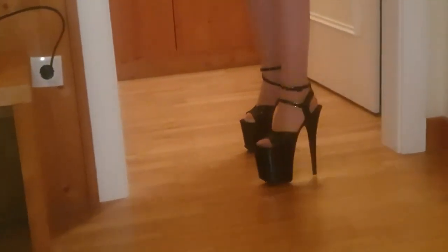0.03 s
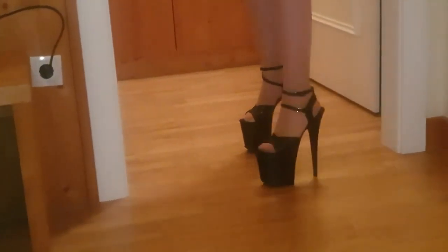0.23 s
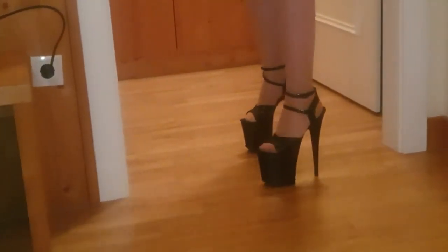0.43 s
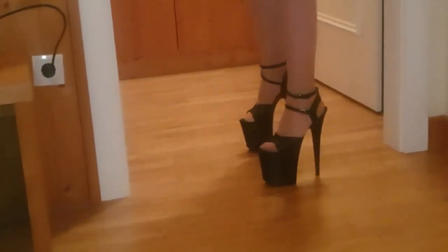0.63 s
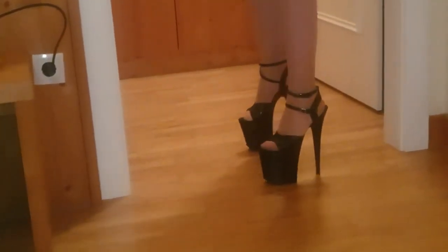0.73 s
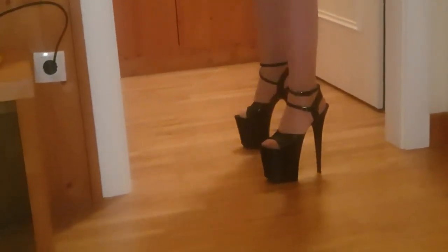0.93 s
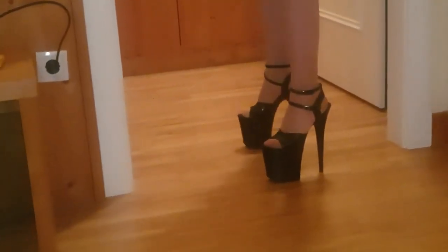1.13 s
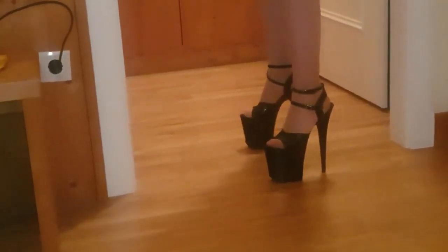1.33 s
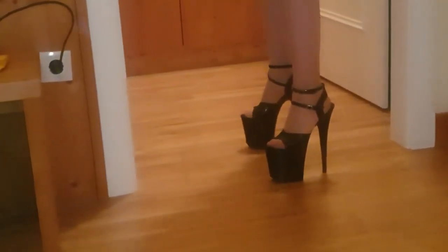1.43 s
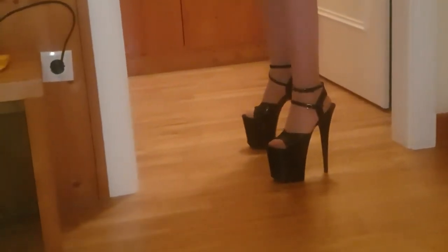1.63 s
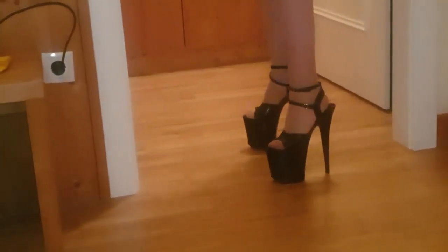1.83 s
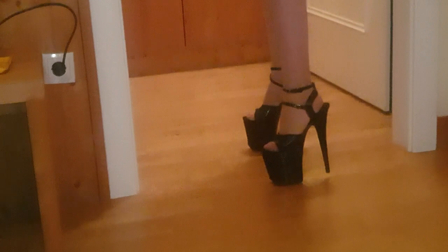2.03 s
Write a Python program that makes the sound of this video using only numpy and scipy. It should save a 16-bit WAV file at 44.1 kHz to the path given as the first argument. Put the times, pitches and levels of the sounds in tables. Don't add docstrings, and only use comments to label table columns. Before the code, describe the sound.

Platform shoes step on a wooden hallway floor: a heavy double thud with heel ticks, a light lone tick, then another softer double knock and faint settling, over low hum and microphone hiss.

```python
import sys
import numpy as np
from scipy import signal
from scipy.fft import rfft, irfft, next_fast_len
from scipy.io import wavfile
from scipy.ndimage import map_coordinates

SR = 44100
rng = np.random.default_rng(int(sys.argv[2]) if len(sys.argv) > 2 else 0)


def master(y):
    cut = np.clip(np.atleast_2d(y).T, -1, 1)
    pcm = np.round(cut * 32767)
    wavfile.write(sys.argv[1], SR, pcm.astype(np.int16))


def volts_from_decibels(level):
    exponent = np.asarray(level, float) / 20
    return 10 ** exponent


N = 92610


def unit(x):
    return x / np.sqrt(np.mean(x ** 2) + 1e-20)


def along(points, hz):
    f, v = np.transpose(points)
    return np.interp(np.log(hz + 1), np.log(f + 1), v)


def filtered(x, response):
    n = x.shape[-1]
    m = next_fast_len(n + 4096)
    return irfft(rfft(x, m) * response(np.fft.rfftfreq(m, 1 / SR)), m)[..., :n]


def peaks(table, f):
    return 1 + sum(volts_from_decibels(db) * 1j * f * w / (c * c - f * f + 1j * f * w) for c, w, db in table)


def band(hz, relative_width):
    w = hz * max(relative_width, 0.05)
    return lambda f: (1j * f * w / (hz * hz - f * f + 1j * f * w)) ** 2


def edge(f, hz, q=0.8):
    r = f / hz
    first, second, third = [1 - r ** 2 + 1j * r / section_q for section_q in (0.55, q, 1.84)]
    return 1 / (first * second * third)


def wobble(rate, n=N):
    return map_coordinates(rng.standard_normal(int(n * rate / SR) + 4), [np.arange(n) * rate / SR])


def panned(db, pan_db):
    return volts_from_decibels(db + np.array([[pan_db], [-pan_db]]) / 2)


def add(out, s, sound):
    part = out[:, round(s * SR):][:, :sound.shape[1]]
    part += sound[:, :part.shape[1]]


# frequency_hz, correlation (0 to 1)
ALIKE = [(100, 0.99), (400, 0.87), (900, 0.43), (2000, 0.067), (8000, 0.039)]


def pair(n):
    turn = lambda hz: np.arccos(np.clip(along(ALIKE, hz), -1, 1)) / 2
    share = lambda hz: np.array([np.cos(turn(hz)), np.sin(turn(hz))])
    mid, side = filtered(rng.standard_normal((2, n)), share)
    return np.array([mid + side, mid - side])


# frequency_hz, t60_s
REVERBERATION = [(100, 0.59), (300, 0.42), (1000, .42), (3000, 0.41), (10000, 0.47)]
HOLD_S, FILL_S = 0.032, 0.0019


def hallway(direct_db):
    n = SR // 2
    hz, t, z = signal.stft(pair(n), SR, nperseg=256)
    decay_db = -60 * np.maximum(t - HOLD_S, 0) / along(REVERBERATION, hz)[:, None]
    tail = signal.istft(z * volts_from_decibels(decay_db), SR, nperseg=256)[1][:, :n]
    tail = tail * (1 - np.exp(-np.arange(n) / SR / FILL_S))
    tail = tail / np.linalg.norm(tail[0])
    tail[:, 0] = volts_from_decibels(direct_db)
    return tail


# frequency_hz, width_hz, level_db
HUM = [(99.5, 13.8, 1), (195, 12, -12.5), (330, 14, -16.5)]
# time_s, lowest_line_level_db
HUM_LOAD = [(0.0, -65), (0.32, -65.5), (0.66, -66.5), (0.95, -66.5), (1.08, -64), (1.17, -62.5),
            (1.31, -63), (1.43, -74), (1.64, -66), (1.84, -66), (2.1, -62)]
# frequency_hz, density_db (per Hz)
AIR = [(15, -65), (25, -35), (102, 5.5), (156, -14.5), (327, -12.5), (368, -16), (460, -16), (1500, -34),
       (1950, -82), (3300, -120)]
AIR_DB, DEEP_DB = -76.5, -67.5
HUM_STEADY, HUM_SWAY_DB = 3.4, 2.3
AIR_FOLLOWS = 0.37


def house():
    t = np.arange(N) / SR
    hum = np.zeros((2, N))
    for hz, width_hz, db in HUM:
        tone = HUM_STEADY * np.sin(2 * np.pi * hz * t)
        hum += volts_from_decibels(db) * unit(tone + unit(filtered(pair(N), band(hz, width_hz / hz))))
    air = unit(filtered(pair(N), lambda f: volts_from_decibels(along(AIR, f)) * (f > 120)))
    deep = unit(filtered(rng.standard_normal((2, N)), band(57, 0.82)))
    load_db = np.interp(t, *np.transpose(HUM_LOAD))
    stir_db = AIR_FOLLOWS * (load_db - load_db.mean())
    hum = volts_from_decibels(load_db + HUM_SWAY_DB * wobble(8.95)) * hum
    air = volts_from_decibels(AIR_DB + wobble(4.8)) * air
    deep = panned(DEEP_DB, 6) * volts_from_decibels(wobble(6.1)) * deep
    return hum + volts_from_decibels(stir_db) * (air + deep)


def friction(hz, relative_width, n):
    grain_db = 1.45 * wobble(60.9, n) + 0.6 * wobble(400, n)
    return unit(filtered(volts_from_decibels(grain_db) * rng.standard_normal((2, n)), band(hz, relative_width)))


# centre_s, length_s, level_db, centre_hz, left_right_db
RUSTLES = [(0.036, 0.33, -76, 9500, -0.5), (0.3, 0.28, -71.5, 9100, 0.5), (0.544, 0.1, -75.5, 2100, 9),
           (0.554, 0.24, -74.5, 8000, -1.5), (1.019, 0.3, -73, 8600, 1), (1.034, 0.2, -77.5, 3056, 6),
           (1.265, 0.21, -75, 9200, 1), (0.86, 0.17, -84.5, 2100, 16), (1.7, .1, -87, 2100, 11.5),
           (2.05, 0.12, -71.5, 9500, -0.5), (2.061, 0.12, -81, 13500, 3), (2.096, 0.29, -75, 1898, 9.5),
           (1.15, 0.8, -84.5, 5100, -3.5), (1.9, 0.47, -76, 285, -1), (1.8, 0.12, -85, 900, 2),
           (0.46, 0.34, -87, 4815, 4.5)]
RUSTLE_WIDTH = 0.65
SCUFF_S, SCUFF_RISE_S, SCUFF_DB, SCUFF_HZ, SCUFF_WIDTH = 0.575, 0.04, -66, 7000, 0.67


def rustles():
    n = SR // 2
    out, t = np.zeros((2, N + n)), np.arange(n) / SR
    half = n / SR / 2
    u = t / SCUFF_RISE_S
    drag = u * np.exp(1 - u)
    add(out, SCUFF_S + half, volts_from_decibels(SCUFF_DB) * drag * friction(SCUFF_HZ, SCUFF_WIDTH, n))
    for s, length, db, hz, pan_db in RUSTLES:
        swell = np.exp(-((t - half) / (0.66 * length)) ** 2) * np.hanning(n) ** 0.5
        add(out, s, panned(db, pan_db) * swell * friction(hz, RUSTLE_WIDTH, n))
    return out[:, round(half * SR):][:, :N]


# start_s, level_db, lower_edge_hz, upper_edge_hz, left_right_db
TICKS = [
    (0.221, -30, 2290, 3320, 4.5),
    (.2285, -33.5, 1760, 3026, -1),
    (.222, -37.5, 980, 1800, 2),
    (0.29, -41.5, 1110, 2470, 2),
    (0.597, -30.5, 1448, 2490, 3.5),
    (.599, -37, 2537, 3860, 5),
    (1.12, -36.5, 1520, 2480, 9.5),
    (1.128, -42.5, 1960, 3170, 9),
]
TICK_DIRECT_DB, TICK_SPILL_DB, SPILL_FALL_DB = -12, -14, 8


def ticks():
    out = np.zeros((2, N))
    for s, db, low_hz, high_hz, pan_db in TICKS:
        spill = volts_from_decibels(TICK_SPILL_DB - SPILL_FALL_DB * (high_hz < 3000))

        def hard(f):
            high_pass = np.conj(edge(low_hz ** 2 / (f + 1), low_hz))
            click = edge(f, high_hz) * edge(f, 0.93 * high_hz)
            return high_pass * (click + spill * edge(f, 4540))

        add(out, s, panned(db + 18, pan_db) * filtered(hallway(TICK_DIRECT_DB), hard))
    return out


# start_s, pitch_hz, peak_db, rise_s, t60_s
SWINGS = [(.2265, 239, -27.5, 0.015, 0.1), (0.22, 151, -32, 0.017, 0.11), (.2525, 375, -29.5, 0.0023, 0.04),
          (.323, 412, -36, 0.0026, 0.047), (0.31, 390, -38, 0.026, 0.17), (0.29, 260, -37.5, 0.0085, 0.14),
          (1.09, 144, -48, 0.039, 0.27), (1.149, 100, -52, .03, 0.44), (1.279, 92.7, -50, 0.028, 0.43),
          (1.932, 94, -50.5, 0.0091, 0.24), (.2275, 2025, -56.5, 0.0015, 0.027),
          (.294, 560, -40, 0.0013, 0.026), (.5975, 1700, -53.5, 0.00065, 0.016),
          (.5985, 2800, -58, 0.0012, 0.025), (1.1205, 2100, -51.5, .001, 0.023),
          (1.1205, 1580, -55.5, 0.0011, 0.022), (1.146, 1900, -59.5, 0.0036, 0.056),
          (1.134, 2110, -64, 0.0024, 0.035), (1.2845, 300, -53, .002, 0.027)]


def swings():
    out, t = np.zeros((2, N)), np.arange(SR // 2) / SR
    for s, hz, db, rise, t60 in SWINGS:
        envelope = volts_from_decibels(db - 60 * t / t60) * (1 - np.exp(-t / rise))
        add(out, s, (envelope * 2 * np.sin(2 * np.pi * hz * t))[None])
    return out


# start_s, level_db, contact_corner_hz, direct_share_db
THUDS = [
    (.219, -20, 664, -11.5),
    (0.2276, -14, 307, -19),
    (.292, -24, 562, -3),
    (.597, -37.5, 900, -9),
    (1.036, -21, 764, -13),
    (1.12, -28, 1097, -7.5),
    (1.12, -28.5, 330, -6),
    (1.285, -34.5, 202, -15),
    (1.649, -45, 375, -30),
]
# frequency_hz, width_hz, level_db
BOARDS = [(96, 52, 12.5), (144.7, 26, 1.5), (176, 14, 4.5), (246.5, 39, 1), (357, 78, 4), (444, 80, 4.5),
          (577, 45, -4.5), (655, 24, 0.5), (828, 70, -4)]
THUD_LOW_HZ, THUD_Q = 112, 0.8


def thuds():
    out = np.zeros((2, N))
    for s, db, hz, direct_db in THUDS:
        def soft(f):
            low_cut = (1j * f / (THUD_LOW_HZ + 1j * f)) ** 2
            return peaks(BOARDS, f) * edge(f, hz, THUD_Q) * low_cut

        add(out, s, volts_from_decibels(db + 19) * filtered(hallway(direct_db), soft))
    return out


def scene():
    return house() + rustles() + ticks() + swings() + thuds()


def band_limit(x):
    return signal.sosfilt(signal.butter(12, 15680, fs=SR, output="sos"), x)


# frequency_hz, width_hz, level_db
LEFT_PORT = [(2100, 128, 9), (3413, 214, 10), (5100, 400, 16), (9550, 720, 3)]
RIGHT_PORT = [(1800, 230, -5.5), (3120, 300, -10), (5000, 2700, 6), (9500, 4900, -9)]
# frequency_hz, density_db (per Hz)
HISS = [(600, -26), (1000, -3), (2500, -4), (5300, -12), (6300, -23.5), (7900, -10), (9800, -3.5),
        (15600, -12.5)]
HISS_DB, ROOM_HISS_DB, TOP_HZ = -74, -85, 15720
RIGHT_BASS_DB, BASS_HZ = 4, 900
DIP_HZ, DIP_WIDE_HZ, DIP_DEPTH = 6500, 1310, 0.34


def record(dry):
    def ports(f):
        right_bass = volts_from_decibels(RIGHT_BASS_DB * (f > 110) / (1 + (f / BASS_HZ) ** 2))
        dip = 1 - DIP_DEPTH * 1j * f * DIP_WIDE_HZ / (DIP_HZ ** 2 - f * f + 1j * f * DIP_WIDE_HZ)
        return np.array([peaks(LEFT_PORT, f), peaks(RIGHT_PORT, f) * right_bass]) * dip

    hiss = volts_from_decibels(HISS_DB) * unit(filtered(rng.standard_normal((2, N)), lambda f: volts_from_decibels(along(HISS, f))))
    room = dry + volts_from_decibels(ROOM_HISS_DB) * rng.standard_normal((2, N))
    mix = filtered(filtered(room, ports) + hiss, lambda f: f < TOP_HZ)
    return band_limit(mix)


dry = scene()
out = record(dry)
master(out)
```